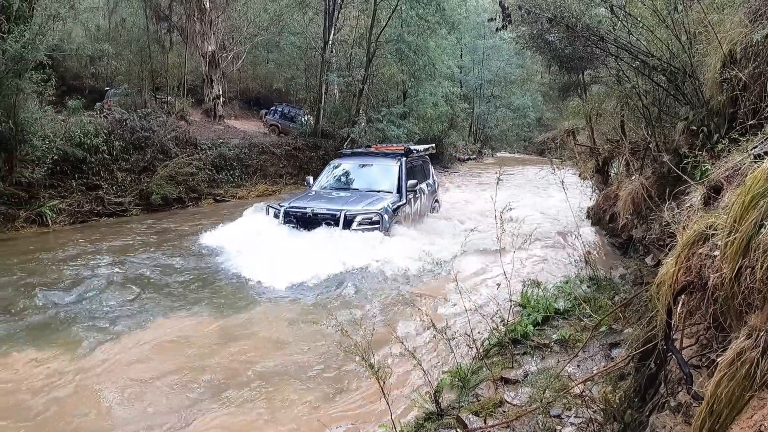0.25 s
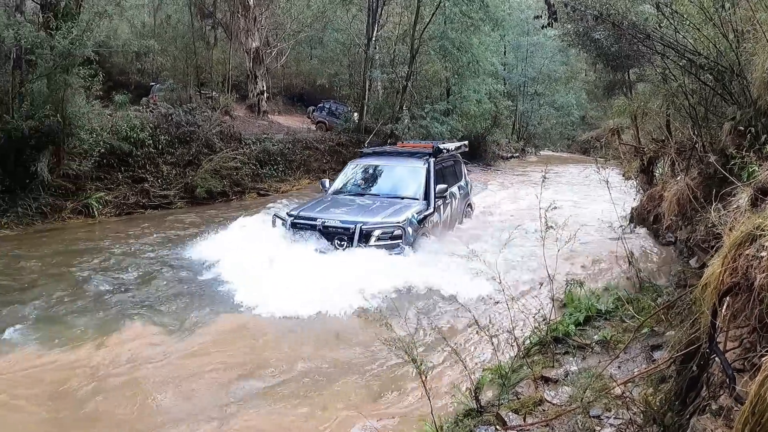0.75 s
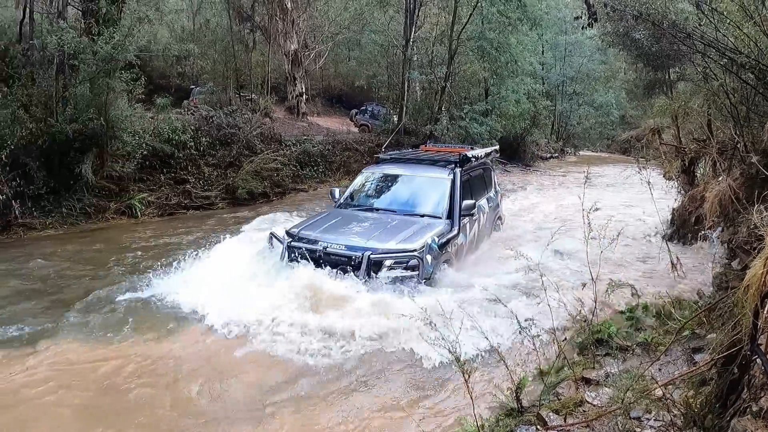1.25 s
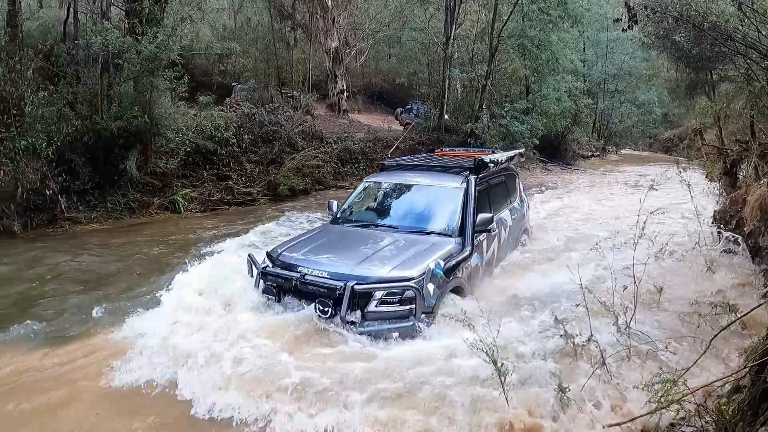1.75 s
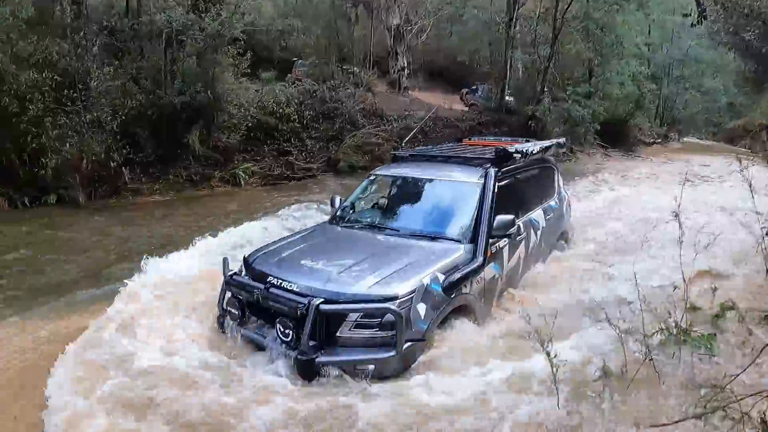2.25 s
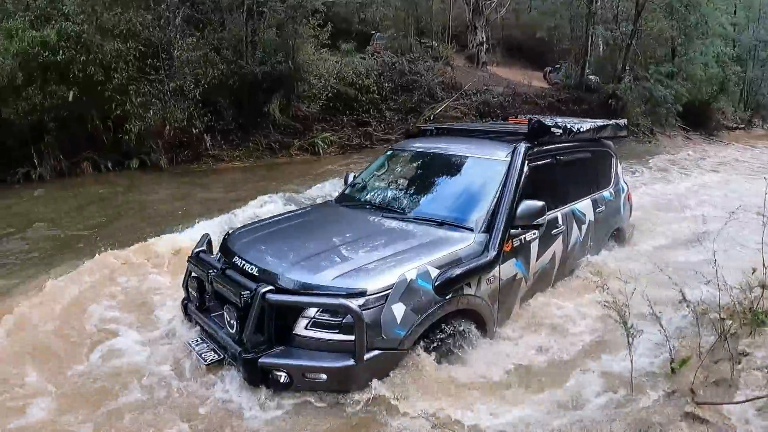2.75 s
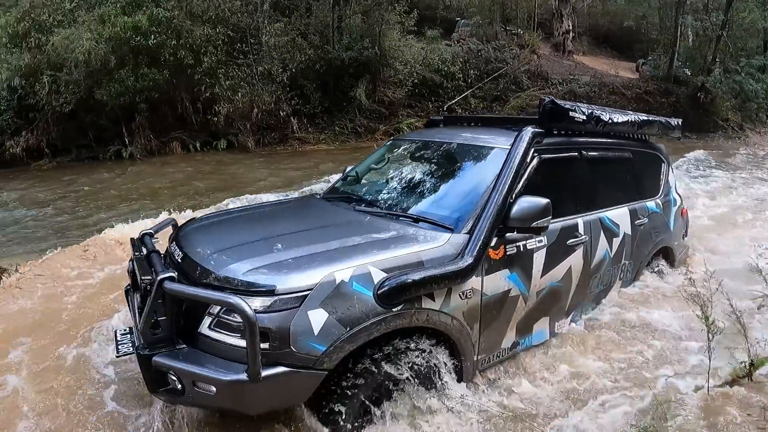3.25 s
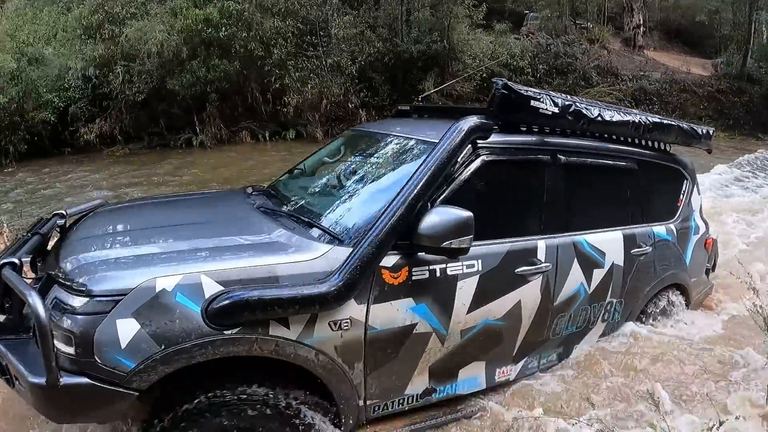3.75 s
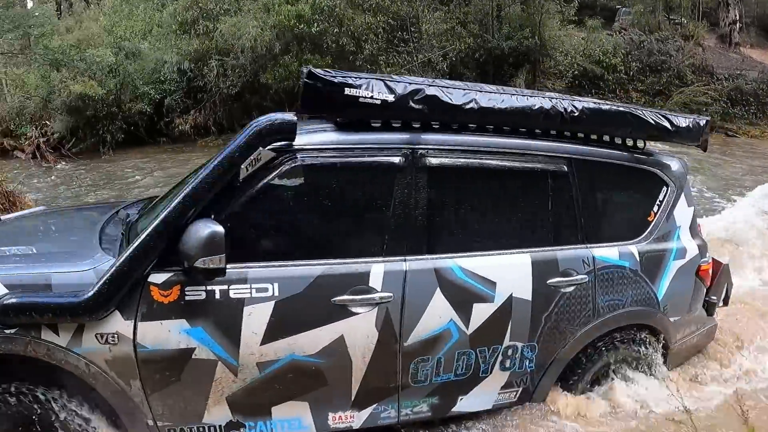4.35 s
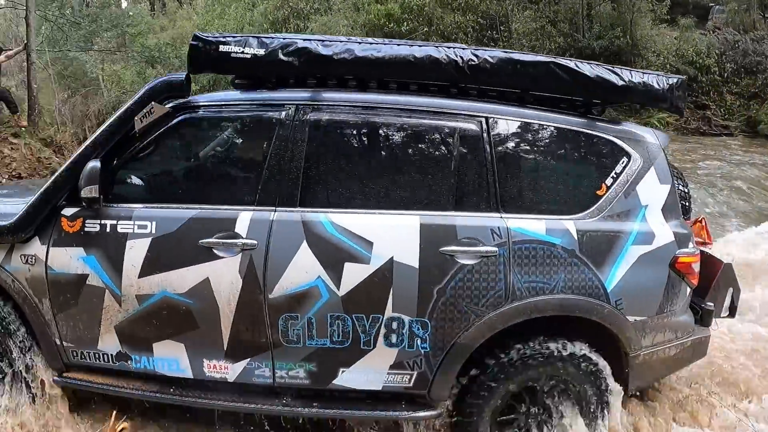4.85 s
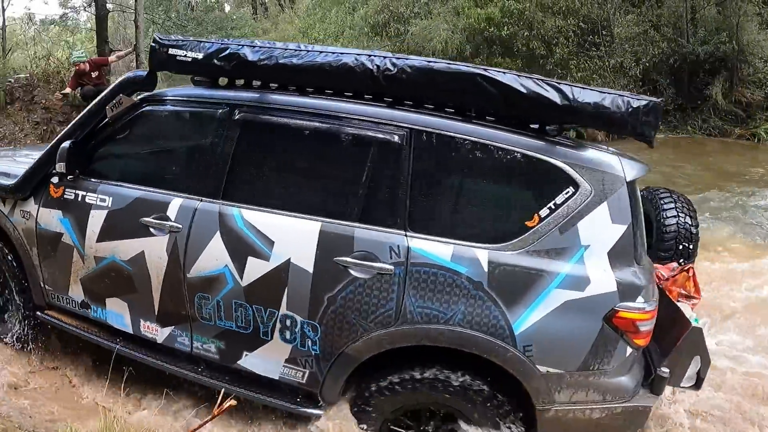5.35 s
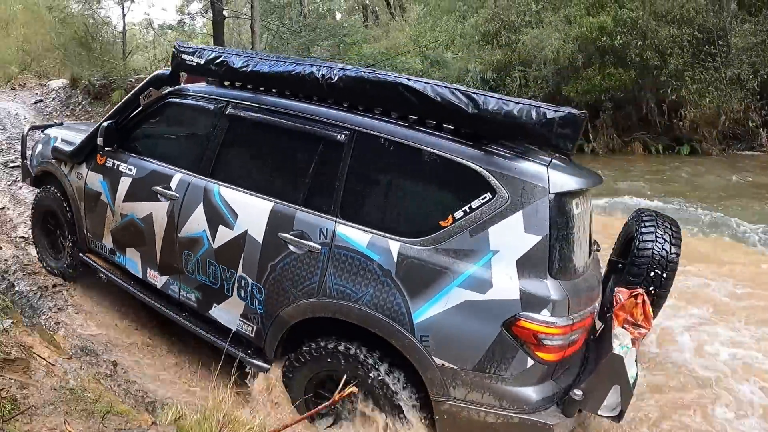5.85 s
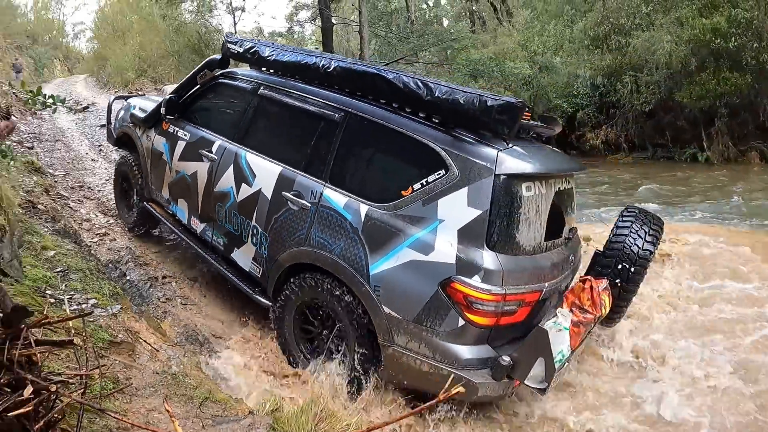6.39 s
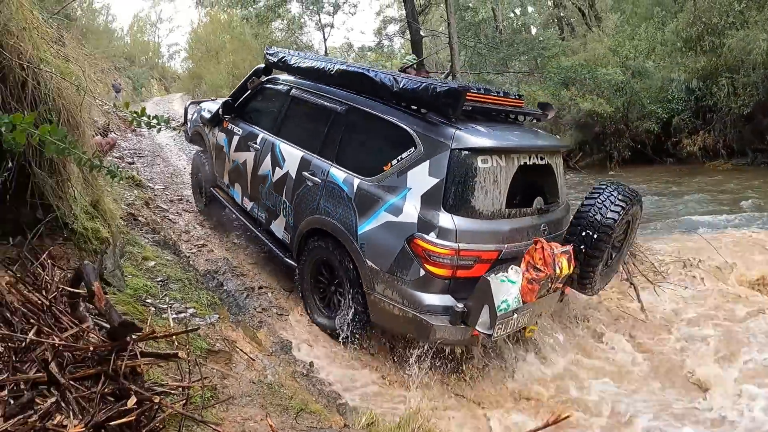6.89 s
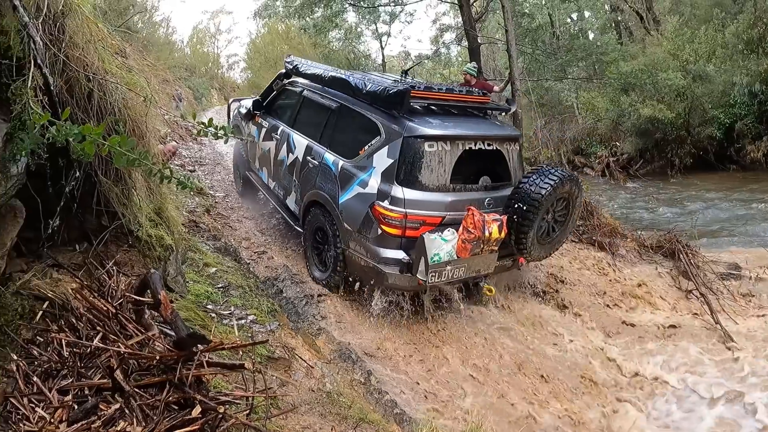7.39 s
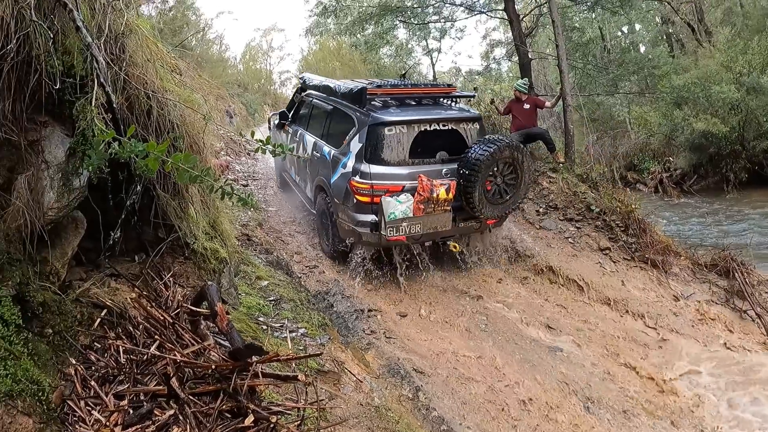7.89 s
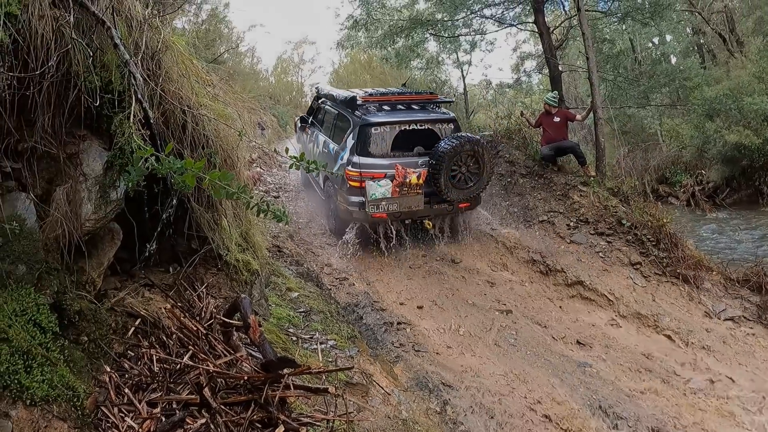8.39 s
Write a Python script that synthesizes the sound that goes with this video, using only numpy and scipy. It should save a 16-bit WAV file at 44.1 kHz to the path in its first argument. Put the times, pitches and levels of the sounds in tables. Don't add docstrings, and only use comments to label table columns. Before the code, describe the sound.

Outdoors at a creek, a V8 off-roader pushes towards a close stereo microphone. Its deep, uneven drone is half drowned while broad white wash, slapping waves and low thuds surge around it. Droplets tick and bubbles plop as it passes. Around four and a half seconds the exhaust lifts clear and gargles into a throaty burble, then the engine revs and barks up the bank as the water thins.

```python
import sys
import numpy as np
from scipy import signal
from scipy.fft import rfft, irfft, next_fast_len
from scipy.io import wavfile
from scipy.ndimage import uniform_filter1d, map_coordinates

SR = 44100
rng = np.random.default_rng(int(sys.argv[2]) if len(sys.argv) > 2 else 0)


def to_linear_factor(level_db):
    exponent = np.asarray(level_db, float) / 20
    return 10 ** exponent


def unload_audio(sound):
    columns = np.transpose(np.atleast_2d(sound))
    steps = np.round(np.clip(columns, -1, 1) * 32767)
    wavfile.write(sys.argv[1], SR, steps.astype(np.int16))


N = 380583
HOP = 8

# time in seconds, four-stroke cycles a second in Hz.
ENGINE_SPEED = [(0, 21.4), (.35, 21.1), (.74, 19.7), (1.05, 20.9), (1.8, 20.4), (2.13, 18.6), (2.53, 20.7),
                (3.15, 21.7), (4.55, 19.9), (4.9, 17.8), (5.55, 18.9), (6.17, 18), (6.5, 19.4), (6.9, 25.6),
                (7.2, 26.4), (7.88, 22.8), (8.36, 25.5), (8.63, 33.4)]
# time in seconds, firing tone in dB.
EXHAUST_LEVEL = [(0, -27.5), (.62, -29), (.82, -19), (1.2, -20.5), (1.34, -27), (1.75, -31), (2.2, -17),
                 (3.15, -16), (3.45, -62), (4.25, -28.5), (4.48, -31), (4.62, -23.5), (5, -15),
                 (5.95, -14.5), (6.8, -11), (7.2, -14), (7.75, -19), (8.63, -13)]
# time in seconds, swell in dB.
GAS_PUFFS = [(.95, -1.5), (2.52, -3.5), (3.24, 4.5), (4.62, 2.5), (4.839, 3), (5.4, -3.5), (6.22, 0.5),
             (6.4, -2), (7.32, -3.5), (7.56, 2), (8.0, 1)]
# order of the cycle, level beside the firing tone in dB.
UNEVEN_CYLINDERS = [(7, -17), (9, -11.5), (10, -23.5), (16, -45)]
# time in seconds, level in dB.
INTAKE_LEVEL = [(0, -19), (.4, -20), (.82, -31.5), (.98, -21.5), (1.7, -20), (2.3, -25.5), (2.5, -21.5),
                (2.7, -27), (3.25, -26.5), (3.5, -40), (4.4, -60), (4.58, -21), (5.12, -33), (5.75, -25),
                (6.35, -34), (7.1, -19), (8.3, -17), (8.55, -30)]
# order of the cycle, level in dB.
BANK_ORDERS = [(2, -19), (3, 1.5), (4, -22), (5, 1.5), (11, 1), (12, -15), (13, -1), (14, -5), (15, -30)]
# frequency in Hz, gain in dB.
PIPE_RESONANCE = [(35, -33), (56, -27.5), (76, -39), (92, -35), (115, -25.5), (130, -18.5), (165, -18.5),
                  (215, -19.5), (258, -25), (300, -50), (335, -36.5), (390, -34)]
# time in seconds, bark level in dB.
ENGINE_LOAD = [
    (4.7, -69),
    (5.1, -52),
    (5.6, -42.5),
    (6.3, -61),
    (6.65, -45.5),
    (7, -45.5),
    (7.7, -52),
    (8, -40),
    (8.4, -37),
    (8.63, -33),
]
# frequency in Hz, gain in dB.
TIP_RESONANCE = [(300, -10), (400, -5.5), (480, -7.5), (560, -1.5), (610, -18), (800, -27)]
# frequency in Hz, density in dB per Hz.
RASP_SPECTRUM = [(350, -28), (550, 4), (1000, -4), (1550, -3), (1800, -24), (2600, -18), (5000, -35)]
# frequency in Hz, density in dB per Hz.
ROAR_SPECTRUM = [(60, -30), (95, -11), (150, -3), (230, 0), (300, -11), (400, -17), (600, -45)]

# time in seconds, flow level in dB.
WATER_FLOW = [(0, -30.5), (.85, -27.5), (1.27, -28.5), (1.75, -26), (2.3, -27), (2.55, -28), (2.93, -29.5),
              (3.3, -28), (3.75, -24), (4.55, -25), (5.5, -35), (6.1, -33.5), (6.55, -35), (7.05, -39.5),
              (7.3, -37.5), (8.27, -35), (8.63, -33.5)]
# time in seconds, swell in dB.
WAVE_SLAPS = [
    (0.01, 0.5),
    (.36, 1),
    (.84, 1.5),
    (1.87, 2),
    (2.13, 4),
    (2.31, 3),
    (3.0, 2.5),
    (3.36, 1),
    (4.52, 1.5),
]
# frequency in Hz, density in dB per Hz.
WASH_SPECTRUM = [(200, -30), (350, -7.5), (500, -2.5), (780, -3.5), (950, -0.5), (1400, -3.5), (2000, -5.5),
                 (3000, -14), (5000, -37.5)]
SPRAY_SPECTRUM = [(1200, -22), (2200, -4), (3000, -2.5), (4800, -3), (5600, -6.5), (7600, -9),
                  (8200, -18.5), (10000, -21.5)]
MIST_SPECTRUM = [(5000, -24), (7000, -5.5), (8200, -0.5), (10000, -5.5), (11200, -5.5), (12400, -7),
                 (13200, -14.5), (15300, -26.5)]
# time in seconds, thud in dB, churn in dB, width in
BODY_SHOVES = [(.7, 4, 1.5, 0.4), (1.5, 5, 4, 0.093), (2.05, 0, 3, 0.16), (2.8, -3, -3.5, 0.29),
               (3.1, 5.5, 4, 0.14), (3.55, 3, 3.5, 0.15), (3.95, -1, 2.5, 0.15), (4.5, 8.5, 3, 0.44),
               (5.25, -2, 3, 0.65), (6.3, 0, 3.5, 0.12), (6.6, 8, 7.5, .2), (8.4, 2, 11.5, 0.9)]
# frequency in Hz, density in dB per Hz.
THUD_SPECTRUM = [(15, -25), (30, -5.5), (45, -4), (65, -4.5), (90, -4), (130, -30.5)]
CHURN_SPECTRUM = [(55, -34), (85, -2.5), (130, -2.5), (200, -3), (320, -5.5), (420, -16), (800, -38)]
# time in seconds, peak in dB, pitch in Hz.
NEAR_DROPS = [
    (1.395, -30, 10000),
    (2.192, -30, 10000),
    (2.654, -19, 5000),
    (2.6633, -21, 9500),
    (3.046, -30, 10000),
    (3.428, -29, 10000),
    (3.789, -19, 5300),
    (8.525, -24, 2450),
]
# time in seconds, peak in dB, pitch in Hz.
BIG_BUBBLES = [
    (1.972, -28, 1100),
    (2.609, -21, 1320),
    (2.731, -18, 1670),
    (3.409, -21, 1330),
    (3.841, -27.5, 930),
    (3.964, -17, 1290),
]

# frequency in Hz, left-right likeness from 0 to 1.
STEREO_LIKENESS = [(60, 1), (200, .995), (380, .96), (700, 0.9), (1300, 0.9), (2400, .76), (4400, 0.81),
                   (8000, 0.82), (15000, 0.56)]
# frequency in Hz, left minus right in dB.
STEREO_LEAN = [(200, 0), (600, -1), (2500, -.5), (5500, -0.2), (9000, 2.3), (13000, -0.5)]

LOW_CLEAR_S, HIGH_CLEAR_S, CLEAR_RISE_S = 4.48, 4.82, 0.068
DULLING_S = 8.305
OUT_S = 7.35


def unit(x):
    return x / np.sqrt(np.mean(x ** 2) + 1e-20)


def along(points, hz):
    f, v = np.transpose(points)
    return np.interp(np.log(hz + 1), np.log(f + 1), v)


def curves(rows):
    s, *cols = np.transpose(rows)
    return [np.interp(np.arange(N) / SR, s, c) for c in cols]


def step(s, rise_s):
    return .5 + .5 * np.tanh((np.arange(N) / SR - s) / rise_s)


def wobble(rate, hop=1):
    knots = map_coordinates(rng.standard_normal(int(N * rate / SR) + 4), [np.arange(0, N + 64, 64) * rate / SR])
    return np.interp(np.arange(0, N, hop), np.arange(len(knots)) * 64, knots)


def coloured(pair, spectrum):
    m = next_fast_len(N + 8192)
    hz = np.fft.rfftfreq(m, 1 / SR)
    turn = np.arccos(np.clip(along(STEREO_LIKENESS, hz), -1, .997)) / 2
    closed = [(5, -120)] + list(spectrum) + [(SR / 2, -120)]
    mid, side = rfft(pair, m) * to_linear_factor(along(closed, hz)) * [np.cos(turn), np.sin(turn)]
    lean = to_linear_factor(along(STEREO_LEAN, hz) / 2)
    return unit(irfft([(mid + side) * lean, (mid - side) / lean], m)[:, :N])


def patchy(depth_db):
    z = signal.stft(rng.standard_normal((2, N + 2048)), nperseg=512)[2]
    field = uniform_filter1d(rng.standard_normal(z.shape[1:]), size=8, axis=0)
    field = uniform_filter1d(field, size=8, axis=1)
    return signal.istft(z * to_linear_factor(depth_db * unit(field)), nperseg=512)[1][:, :N]


def shaft():
    cycle_hz = uniform_filter1d(curves(ENGINE_SPEED)[0], size=6000, mode="nearest")
    angle = 2 * np.pi * np.cumsum(cycle_hz) / SR
    burst_s = 8.609
    angle += .6 - angle[round(burst_s * SR)]
    return cycle_hz, angle


def exhaust_level():
    t = np.arange(N) / SR
    puff_s = 0.053
    puffs_db = sum(db * np.exp(-((t - s) / puff_s) ** 2) for s, db in GAS_PUFFS)
    return curves(EXHAUST_LEVEL)[0] + puffs_db


def order(k, angle, db, lag=0, scatter_db=.8):
    turn = k * angle[::HOP] - lag + np.pi * (k > 8) + .12 * wobble(6, HOP)
    return np.sqrt(2) * to_linear_factor(db[::HOP] + scatter_db * wobble(12, HOP)) * np.cos(turn)


def firing_tone(angle, firing_db):
    tone = order(8, angle, firing_db)
    for k, db in UNEVEN_CYLINDERS:
        tone += order(k, angle, firing_db + db, lag=.6)
    return tone


def intake_drone(angle):
    return order(6, angle, curves(INTAKE_LEVEL)[0], lag=.9)


def bank_burble(angle, cycle_hz, firing_db, bark_db):
    low_free, high_free = step(LOW_CLEAR_S, CLEAR_RISE_S), step(HIGH_CLEAR_S, CLEAR_RISE_S)
    duck_db = 0.14 * (firing_db - firing_db.mean())
    low_drowned_db = -7 + duck_db + 3 * wobble(6)
    high_drowned_db = -21 + 2 * duck_db + 3 * wobble(6.5)
    high_free_db = -2.5 + 0.38 * (cycle_hz - 20) + 0.18 * (bark_db + 48.5)
    low_db = low_free * -1 + (1 - low_free) * low_drowned_db
    high_db = high_free * high_free_db + (1 - high_free) * high_drowned_db
    hot_pipe_hz = cycle_hz / (1 + 0.05 * step(8.03, 0.18))
    tones = 0
    for k, db in BANK_ORDERS:
        level_db, pipe_hz = (low_db, cycle_hz) if k < 8 else (high_db, hot_pipe_hz)
        tones = tones + order(k, angle, level_db + db + along(PIPE_RESONANCE, k * pipe_hz))
    return tones


def tip_bark(angle, cycle_hz, bark_db):
    tones = 0
    for k in range(17, 27):
        weak_db = -13 * (k % 8 in (7, 0, 1)) + 5 * (k == 26)
        db = bark_db + weak_db + along(TIP_RESONANCE, k * cycle_hz)
        tones = tones + order(k, angle, db, lag=k * k / 5, scatter_db=2)
    return tones


def gas_rasp(angle, cycle_hz, bark_db):
    gate = np.exp(2.2 * np.cos(angle - .6) + .4 * np.cos(8 * angle))
    rasp_db = -52.5 + 0.62 * (bark_db + 41) + 1.8 * (cycle_hz - 24)
    return to_linear_factor(rasp_db) * unit(gate * coloured(rng.standard_normal((2, N)), RASP_SPECTRUM))


def gas_roar(firing_db):
    free = step(HIGH_CLEAR_S, CLEAR_RISE_S)
    return to_linear_factor(firing_db - 23) * free * coloured(patchy(0.64), ROAR_SPECTRUM)


def engine():
    cycle_hz, angle = shaft()
    firing_db, bark_db = exhaust_level(), curves(ENGINE_LOAD)[0]
    tones = firing_tone(angle, firing_db) + intake_drone(angle)
    tones += bank_burble(angle, cycle_hz, firing_db, bark_db)
    tones += tip_bark(angle, cycle_hz, bark_db)
    tones = signal.resample_poly(tones, HOP, 1, padtype="line")[:N]
    return tones + gas_rasp(angle, cycle_hz, bark_db) + gas_roar(firing_db)


def flow():
    t = np.arange(N) / SR
    rise_s, fall_s = .02, 0.069
    db = curves(WATER_FLOW)[0]
    for s, swell_db in WAVE_SLAPS:
        db = db + swell_db * np.exp(np.minimum((t - s) / rise_s, (s - t) / fall_s))
    return db, db - db.mean()


def bubbles(start, size, hz, cycles):
    t = np.arange(min(400, round(3.5 * cycles * SR / np.min(hz))), dtype=np.float32) / SR
    hz = hz.astype(np.float32)
    life = hz[:, None] * t / cycles
    ring = np.sin(2 * np.pi * hz[:, None] * t * (1 + 0.091 * life))
    ring = ring * np.exp(-life) * (1 - np.exp(-6 * life))
    where = (start[:, None] * SR).astype(int) + np.arange(len(t))
    return np.bincount(where.ravel(), (size[:, None] * ring).ravel(), N + SR)[:N]


def foam(count, hz, spread, cycles):
    patches = []
    for _ in range(2):
        u, g = rng.random((count, 2)), rng.standard_normal(count)
        pitch = np.clip(hz * np.exp(spread * g), hz / 3, SR / 3)
        size = to_linear_factor(14 * u[:, 1] ** 2)
        patches.append(unit(bubbles(u[:, 0] * N / SR, size, pitch, cycles)))
    return np.array(patches)


def creek():
    flow_db, swing_db = flow()
    dulling_s = np.maximum(np.arange(N) / SR - DULLING_S, 0)
    slosh_db = 0.26 * wobble(30) + 0.33 * wobble(90)
    wash_db = flow_db - 12 * dulling_s + 0.37 * slosh_db
    spray_db = flow_db - 5 + (1.024 - 1) * swing_db - 33 * dulling_s + 1.06 * slosh_db
    mist_db = flow_db - 19.5 + (0.94 - 1) * swing_db - 35 * dulling_s + 1.1 * slosh_db
    wash = patchy(0.94) + 0.15 * foam(count=9000, hz=1100, spread=0.618, cycles=4.25)
    spray = patchy(0.5) + 0.23 * foam(count=9000, hz=4220, spread=0.413, cycles=2.3)
    mist = patchy(.55) + .3 * foam(count=5000, hz=10500, spread=.25, cycles=1.5)
    water = to_linear_factor(wash_db) * coloured(wash, WASH_SPECTRUM)
    water += to_linear_factor(spray_db) * coloured(spray, SPRAY_SPECTRUM)
    water += to_linear_factor(mist_db) * coloured(mist, MIST_SPECTRUM)
    return water


def surge():
    t, swing_db = np.arange(N) / SR, flow()[1]
    shove_db, stir_db = np.zeros((2, N))
    for s, thud_swell_db, churn_swell_db, width_s in BODY_SHOVES:
        lunge = np.exp(-((t - s) / width_s) ** 2)
        shove_db += thud_swell_db * lunge
        stir_db += churn_swell_db * lunge
    thud_db = -33.5 + .5 * swing_db + shove_db - 6.5 * step(OUT_S, .15)
    churn_db = -30.5 + 0.56 * swing_db + stir_db - 3 * step(OUT_S, .3)
    thud = coloured(patchy(.6), THUD_SPECTRUM)
    churn = coloured(patchy(0.98) * to_linear_factor(0.99 * wobble(70)), CHURN_SPECTRUM)
    return to_linear_factor(thud_db) * thud + to_linear_factor(churn_db) * churn


def splashes():
    s, db, hz = np.transpose(NEAR_DROPS)
    ticks = bubbles(s, to_linear_factor(db), hz, cycles=4)
    s, db, hz = np.transpose(BIG_BUBBLES)
    return ticks + bubbles(s, to_linear_factor(db), hz, cycles=4.5)


def scene():
    return engine() + creek() + surge() + splashes()


def roll_off(x):
    return signal.sosfilt(signal.butter(12, 15690, fs=SR, output="sos"), x)


def record(dry):
    top, knee = 0.91, 4.5
    fade = np.clip(np.arange(N)[::-1] / 60, 0, 1)
    mix = fade * dry / (1 + abs(dry / top) ** knee) ** (1 / knee)
    return roll_off(mix)


dry = scene()
out = record(dry)
unload_audio(out)
```